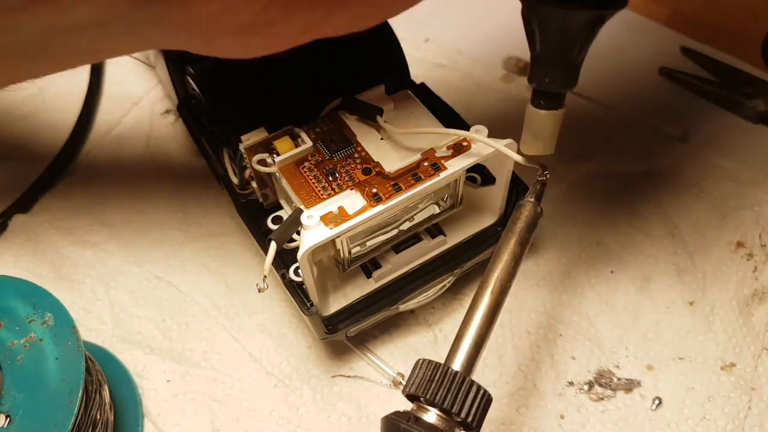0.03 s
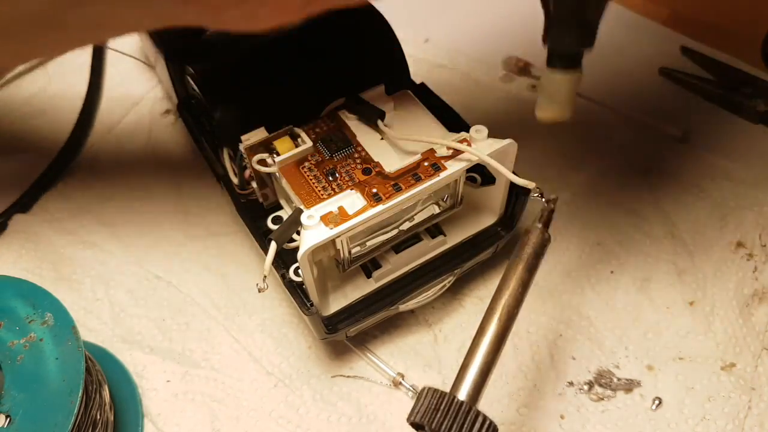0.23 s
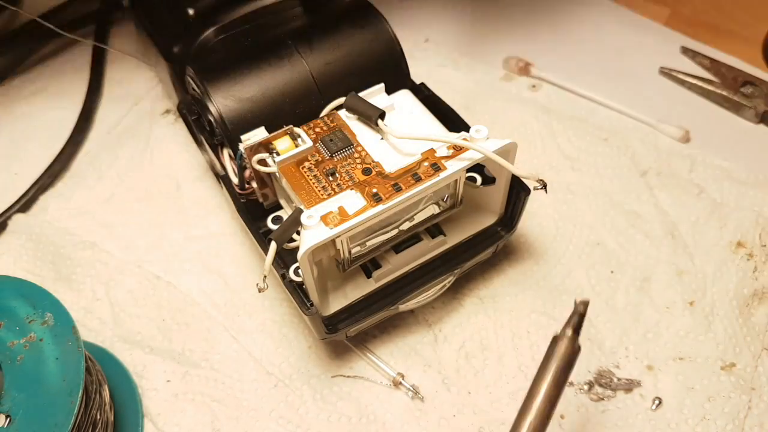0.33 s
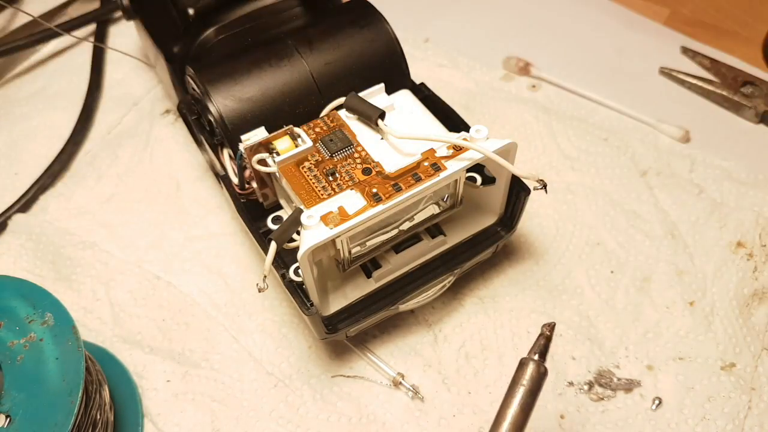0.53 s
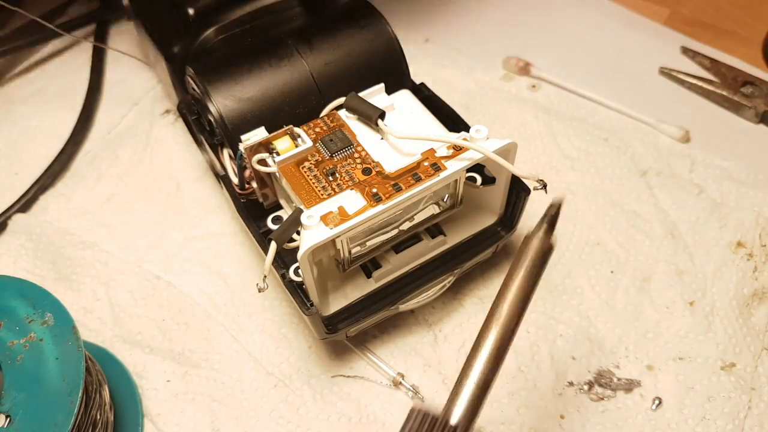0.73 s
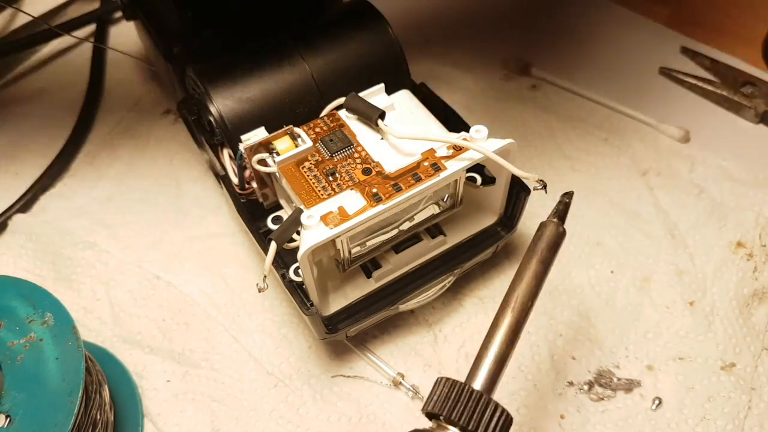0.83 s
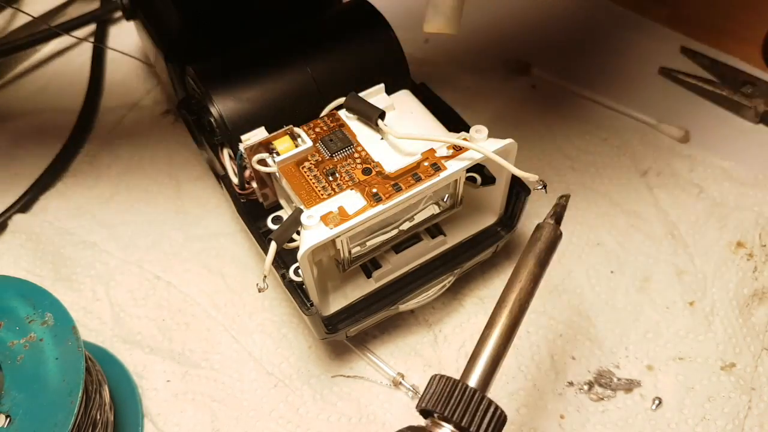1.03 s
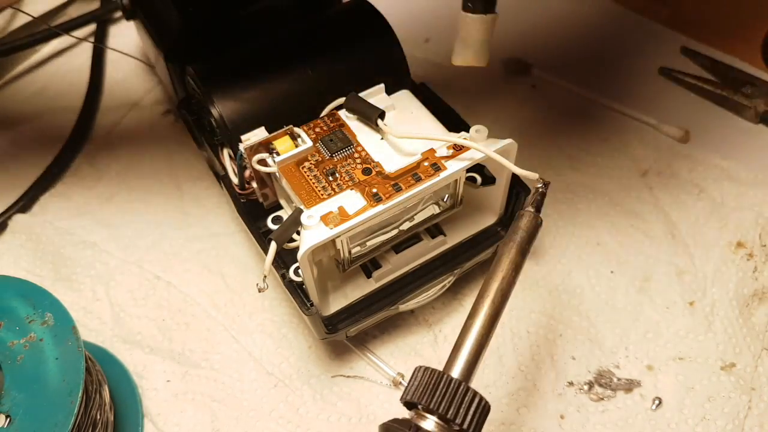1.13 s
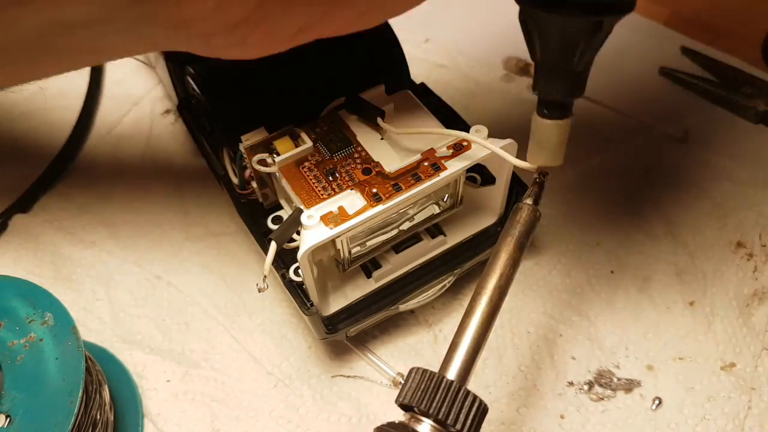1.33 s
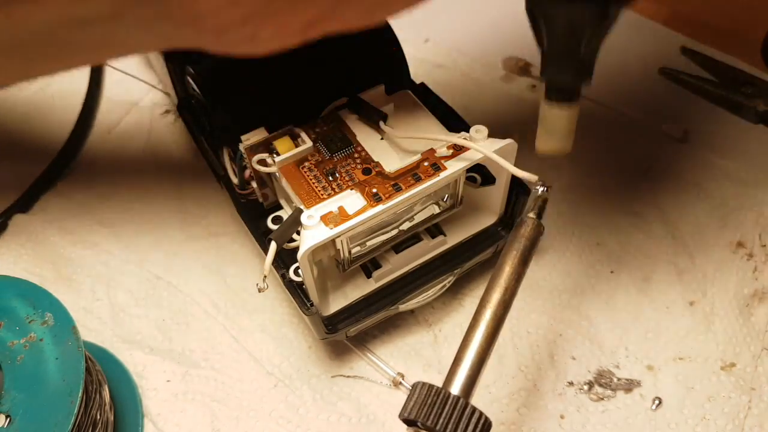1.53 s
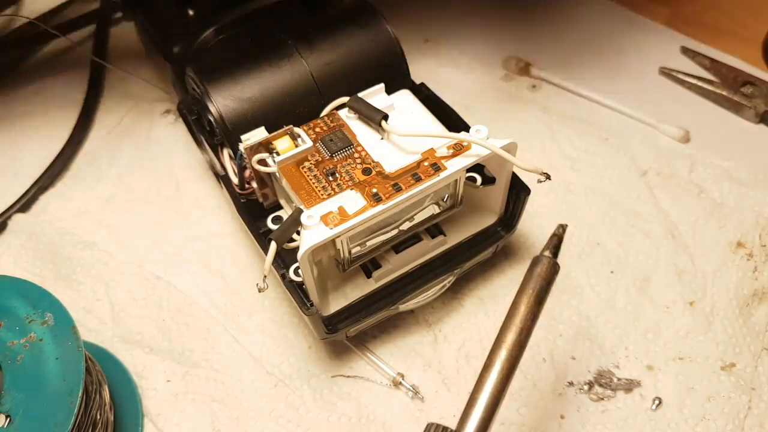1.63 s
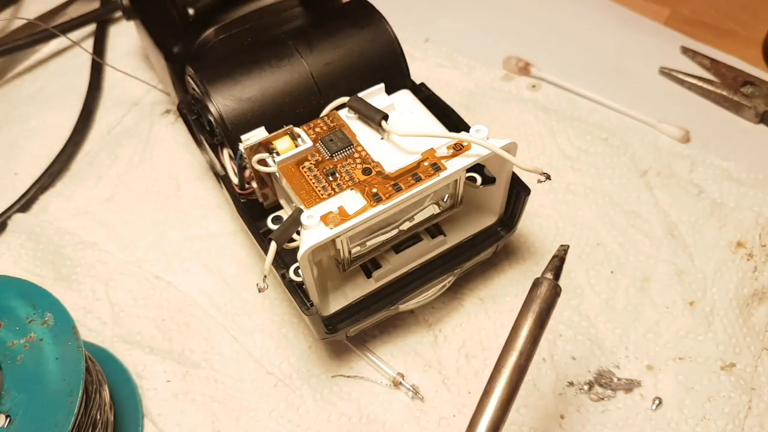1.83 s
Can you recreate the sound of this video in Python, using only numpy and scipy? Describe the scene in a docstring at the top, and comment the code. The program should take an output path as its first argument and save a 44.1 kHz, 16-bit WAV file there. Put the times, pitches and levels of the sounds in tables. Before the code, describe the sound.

Close to the microphone, a desoldering pump releases with a hard clack and latches again with a smaller click. After a pause it clacks once more, followed by faint taps, in a quiet, dry workroom.

```python
"""Desoldering pump, two shots

A spring-loaded pump, close by on a workbench in a small dry room with faint mains hum.
Each shot: the catch slips; the plunger scrapes up the barrel, slams into its stop, gulps air, drops back.
Between shots it is pushed down until it latches; a second push starts at the end. Tools tap faintly."""
import sys
import numpy as np
from scipy import signal
from scipy.fft import rfft, irfft, next_fast_len
from scipy.io import wavfile

SR = 44100
rng = np.random.default_rng(int(sys.argv[2]) if len(sys.argv) > 2 else 0)


def put_to_file(sound):
    """Save the sound as 16-bit audio at rate SR, in the file named by the first command-line argument."""
    columns = np.atleast_2d(sound).T  # one column per channel
    safe = np.clip(columns, -1, 1)
    whole_steps = np.round(safe * 32767)
    wavfile.write(sys.argv[1], SR, whole_steps.astype(np.int16))


N = 83790

# room noise spectrum (frequency [Hz], gain [dB])
FLOOR_TONE = [(20, -16), (40, -19.5), (70, -15.5), (100, -12), (135, -14), (200, -13.5), (400, -18.5),
              (700, -24.5), (1800, -26), (4000, -34), (9000, -44), (11000, -42), (13000, -39), (16000, -39)]
# room noise left-right match (frequency [Hz], correlation)
FLOOR_CORRELATION = [(60, .6), (240, .66), (950, -0.091), (3800, -.15), (15000, -0.08)]
# mains hum (frequency [Hz], level [dB])
HUM_PARTIALS = [(99.8, -75.5), (498, -88)]

# plunger strokes (start [s], peak time [s], level [dB], 60 dB rise [s], 60 dB fall [s])
FLIGHT_STROKES = [(.2365, .2515, -33, .04, 0.084), (1.5585, 1.579, -32, 0.051, 0.043)]
PUSH_STROKES = [(.569, .604, -56.5, 0.15, 0.13), (.612, .618, -52, 0.044, .03),
                (.657, .668, -54, .08, 0.035), (1.864, 1.893, -63, 0.47, 0.12)]
# knocks on the barrel (time [s], level [dB], t60 [s])
CLACK_HITS = [(0.2429, -8.5, 0.032), (1.571, -5.5, 0.054), (1.5804, -25, 0.0073)]
# end-stop hits and bounces (time [s], relative level [dB], pitch ratio)
SLAM_HITS = [(.2503, -2, 1.02), (.2543, -1.5, .99), (.2623, -18, 1), (1.5663, -22, 1), (1.5809, -6, 1.02),
             (1.5842, -9.5, 1), (1.5865, -16, 1), (1.592, -18, 1)]
# casing recoil (time [s], level [dB], frequency [Hz])
THUMP_HITS = [(.2505, -18, 218), (1.5805, -13.5, 303)]
# air pulses (time [s], level [dB])
GULP_PULSES = [(0.2509, -31), (1.5781, -31)]
# small impacts (time [s], relative level [dB])
SLIP_HITS = [(0.2299, -41.5), (1.552, -33)]
DROP_HITS = [(0.3041, -22.5), (.3132, -50), (1.6208, -22.5), (1.628, -40)]
TAP_HITS = [(0.4583, -45.5), (1.677, -54), (1.7852, -51.5)]
BUMP_HITS = [(0.5914, -35), (0.598, -35), (0.6578, -35.5), (.6705, -52), (.672, -27.5), (1.897, -32.5)]
LATCH_HITS = [(0.619, -16.5)]
PING_HITS = [(1.8645, -41.5)]

# modes of struck parts (frequency [Hz], relative level [dB], t60 [s])
BARREL_MODES = [(520, -22, .025), (655, -23, .025), (800, -20, .02), (960, -24, .025), (1222, -11, .022),
                (1490, -12, .025), (1720, 0, .012), (1760, -21, .07), (1930, -21, .04), (2090, -20, .025),
                (2690, -24, .03), (3070, -20, .035), (4050, -28, .045)]
PLUNGER_MODES = [(1500, -4, .005), (2050, 0, .006), (3700, -6, .006), (6100, -6, .012), (6450, -10, .01)]
CATCH_MODES = [(1600, -5, .006), (2150, 0, .009), (2400, -8, .04), (3246, -22, .07), (4200, -14, .02),
               (6250, -5, .012)]
SPRING_MODES = [(1930, 2, 0.025), (2130, -8, 0.035), (6300, -16, 0.12), (12900, -13, .09)]

# contact, friction and bench echo spectra (frequency [Hz], gain [dB])
SLIP_EQ = [(200, -16.5), (1000, -18), (1900, -18.5), (2500, -1.5), (3600, -12.5), (5400, -8), (8500, -29.5),
           (16000, -29)]
FLIGHT_EQ = [(50, -9.5), (300, 0.5), (750, 0.5), (1050, -4.5), (1600, -2.5), (3000, -4), (4500, -9),
             (7000, -7), (9000, -18), (13000, -13.5), (16000, -13)]
CLACK_EQ = [(60, -14.5), (350, 6), (1000, -13.5), (1500, 3), (3000, 0.5), (5000, -9), (7500, -7),
            (9000, -15), (12000, -13), (16000, -20)]
SLAM_EQ = [(60, -13), (250, -10.5), (900, 2), (1700, -3.5), (3200, -6), (6500, -9), (9000, -14.5),
           (12500, -4.5), (16000, -18.5)]
DROP_EQ = [(100, -26), (750, -24), (1350, -3), (2000, -1), (2900, -8), (3700, -2), (5100, -9), (6150, 0),
           (7200, -9), (9000, -19), (15000, -14)]
TAP_EQ = [(200, -14), (900, -22), (1350, 12), (2100, -9), (3200, 2), (5000, 1.5), (6500, -6.5),
          (8200, -0.5), (10000, -8), (16000, -6)]
PUSH_EQ = [(40, -10.5), (160, 3.5), (500, -11.5), (1200, -14.5), (2400, -9), (4000, -13.5), (7000, -20),
           (9000, -20), (16000, -22)]
BUMP_EQ = [(40, -15), (130, -3), (220, 4.5), (420, -4.5), (650, -1.5), (950, -14), (2400, -10.5),
           (6000, -17.5), (16000, -32.5)]
LATCH_EQ = [(60, -26), (200, -16), (900, -16), (1400, -6), (2350, 0), (3500, -4), (6300, -5), (8500, -12),
            (11000, -11), (16000, -19)]
BENCH_EQ = [(100, -5), (700, 2), (1700, -3), (3000, -1), (8000, -3), (16000, 0.5)]

# noise common to both channels (frequency [Hz], power share)
COMMON_SHARE = [(300, .95), (1500, .55), (4000, .45), (12000, .35)]
# stereo balance (frequency [Hz], left minus right [dB])
LEFT_BIAS = [(100, -.5), (700, -0.03), (2000, 2.5), (4400, -0.5), (8000, 1), (14000, 3.5)]
# room decay (frequency [Hz], t60 [s])
ROOM_DECAY = [(100, .11), (400, 0.057), (1000, 0.05), (2000, .115), (5000, .12), (10000, 0.059),
              (16000, 0.1084)]

FIRE_LAG_S, COCK_LAG_S = .000018, .00011  # right channel delay
BENCH_DB, BENCH_T60_S, BENCH_DELAY_S, ROOM_DELAY_S = -12.5, .04, .0028, .006
RING_RISE_CYCLES, SCRAPE_ONSET_S = .37, .001


def amp(db):
    """Decibels to gain."""
    return 10 ** (np.asarray(db) / 20)


def unit(x):
    """Scale to unit mean channel energy."""
    return x / np.sqrt(np.mean(np.sum(x ** 2, -1)) + 1e-20)


def lookup(table, hz):
    """Interpolate over log frequency."""
    table_hz, values = np.transpose(table)
    return np.interp(np.log(hz + 1), np.log(table_hz), values)


def clock(size=8192):
    """Time axis [s]."""
    return np.arange(size) / SR


def sequence(events):
    """Stereo mix of (time [s], level [dB], sound) events."""
    mix = np.zeros((2, N))
    for at_s, db, sound in events:
        span = mix[:, round(at_s * SR):][:, :sound.shape[-1]]
        span += amp(db) * sound[..., :span.shape[1]]
    return mix


def colour(x, eq, size=2048):
    """Minimum-phase filter with unit-energy taps."""
    log_gain = np.log(amp(lookup(eq, abs(np.fft.fftfreq(size, 1 / SR)))))
    response = np.exp(np.conj(signal.hilbert(log_gain)))
    taps = np.fft.ifft(response).real[:size // 2]
    return signal.fftconvolve(x, unit(taps)[None], axes=1)[:, :x.shape[1]]


def noise_pair(size):
    """Stereo noise, most alike in the bass."""
    spectra = rfft(rng.standard_normal((3, size)))
    share = np.clip(lookup(COMMON_SHARE, np.fft.rfftfreq(size, 1 / SR)), 0, 1)
    return irfft(np.sqrt(share) * spectra[0] + np.sqrt(1 - share) * spectra[1:], size)


def contact(eq, rattle_share, t60_s):
    """Sharp first touch, then a dying rattle of tiny ones with the given energy share."""
    t = clock()
    force = np.sqrt(rattle_share) * unit(noise_pair(len(t)) * amp(-60 * t / t60_s) * (t > 0))
    force[:, 0] = -np.sqrt(1 - rattle_share)
    return unit(colour(force, eq))


def ring(modes, pitch=1):
    """Decaying modes of a struck part; pressure follows surface velocity."""
    t = clock()
    motion = 0
    for hz, db, t60_s in modes:
        envelope = amp(db - 60 * t / t60_s) * (1 - np.exp(-t * hz / RING_RISE_CYCLES))
        motion += envelope * np.sin(2 * np.pi * hz * pitch * t) / hz
    return -unit(np.diff(motion, prepend=0))


def room_tone(noise_db=-74):
    """Steady room noise and mains hum."""
    hz, t = np.fft.rfftfreq(N, 1 / SR), clock(N)
    left, other = rfft(rng.standard_normal((2, N)))
    match = np.clip(lookup(FLOOR_CORRELATION, hz), -1, 1)
    right = match * left + np.sqrt(1 - match ** 2) * other
    air = irfft(np.array([left, right]) * amp(lookup(FLOOR_TONE, hz)), N)
    hum = sum(amp(db) * np.sqrt(2) * np.sin(2 * np.pi * (f * t + rng.random())) for f, db in HUM_PARTIALS)
    return amp(noise_db) * np.sqrt(N) * unit(air) + hum


def catch_slips():
    """The catch clicks off the plunger."""
    return sequence((s, db, contact(SLIP_EQ, .53, t60_s=.016)) for s, db in SLIP_HITS)


def plunger_scrape(strokes, eq, grain_db):
    """Grainy friction along the barrel; each stroke swells and fades."""
    t = clock(N)
    envelope = 0
    for start_s, peak_s, db, rise_s, fall_s in strokes:
        onset = np.clip((t - start_s) / SCRAPE_ONSET_S, 0, 1)
        envelope += onset * amp(db - 60 * np.maximum((peak_s - t) / rise_s, (t - peak_s) / fall_s))
    grains = amp(grain_db * np.repeat(rng.standard_normal(N), 32)[:N])
    grains /= np.sqrt(np.mean(grains ** 2))
    return colour(noise_pair(N) * envelope * grains, eq)


def barrel_clacks():
    """The freed plunger knocks against the barrel."""
    return sequence((s, db, contact(CLACK_EQ, .97, t60_s)) for s, db, t60_s in CLACK_HITS)


def stop_slams(ring_db=-1, contact_db=-9):
    """The plunger hits its stop and bounces, ringing the barrel."""
    barrel = sequence((s, db + ring_db, ring(BARREL_MODES, pitch)) for s, db, pitch in SLAM_HITS)
    hits = sequence((s, db + contact_db, contact(SLAM_EQ, .62, t60_s=.028)) for s, db, _ in SLAM_HITS)
    return barrel + hits


def casing_thumps(t60_s=.06):
    """Recoil excites one low casing mode."""
    return sequence((s, db, ring([(hz, 0, t60_s)])) for s, db, hz in THUMP_HITS)


def air_gulps(width_s=.0013):
    """Nozzle suction: a pressure dip inside a wider, weaker rise."""
    pressure = np.zeros(N)
    for at_s, db in GULP_PULSES:
        u = (clock(N) - at_s) / width_s
        pressure -= amp(db) * (np.exp(-u ** 2) - np.exp(-(u / 4) ** 2) / 4)
    return pressure


def plunger_drops(ring_db=-4):
    """The plunger drops back, rings and bounces once."""
    plunger = amp(ring_db) * ring(PLUNGER_MODES)
    return sequence((s, db, plunger + contact(DROP_EQ, .88, t60_s=.01)) for s, db in DROP_HITS)


def tool_taps():
    """Tools tap faintly in the hands."""
    return sequence((s, db, contact(TAP_EQ, .86, t60_s=.015)) for s, db in TAP_HITS)


def body_bumps():
    """Hand and plunger bump the body while cocking."""
    return sequence((s, db, contact(BUMP_EQ, .79, t60_s=.017)) for s, db in BUMP_HITS)


def catch_latch(ring_db=-6.5, contact_db=5.5):
    """The catch snaps home and rings."""
    snap = amp(ring_db) * ring(CATCH_MODES) + amp(contact_db) * contact(LATCH_EQ, .91, t60_s=.009)
    return sequence((s, db, snap) for s, db in LATCH_HITS)


def spring_ping():
    """The spring rings as the push takes hold."""
    return sequence((s, db, ring(SPRING_MODES)) for s, db in PING_HITS)


def place(x, lag_s, room_db):
    """Add bench reflections and a short room tail; shift left of centre."""
    t = clock(16384)
    bench = noise_pair(len(t)) * amp(-60 * t / BENCH_T60_S) * (t > BENCH_DELAY_S)
    bench = unit(colour(bench, BENCH_EQ))
    band_hz, frame_s, bands = signal.stft(noise_pair(len(t)), SR, nperseg=128)
    bands *= amp(-60 * frame_s / lookup(ROOM_DECAY, band_hz)[:, None])
    tail = signal.istft(bands, SR, nperseg=128)[1][:, :len(t)]
    echoes = amp(BENCH_DB) * bench + amp(room_db) * unit(tail * (t > ROOM_DELAY_S))
    wet = x + signal.fftconvolve(x, echoes, axes=1)[:, :N]
    size = next_fast_len(N + len(t))
    hz = np.fft.rfftfreq(size, 1 / SR)
    left = amp(lookup(LEFT_BIAS, hz) / 2)
    right = np.exp(-2j * np.pi * hz * lag_s) / left
    return irfft(rfft(wet, size) * np.array([left, right]), size)[:, :N]


def scene():
    """Shots, small clicks and cocking over room tone."""
    shots = plunger_scrape(FLIGHT_STROKES, FLIGHT_EQ, grain_db=-.5)
    shots += barrel_clacks() + stop_slams() + casing_thumps() + air_gulps()
    mix = place(shots, FIRE_LAG_S, room_db=-16)
    mix += place(catch_slips() + plunger_drops() + tool_taps(), FIRE_LAG_S, room_db=-24.5)
    cocking = plunger_scrape(PUSH_STROKES, PUSH_EQ, grain_db=1.5)
    cocking += catch_latch() + body_bumps() + spring_ping()
    mix += place(cocking, COCK_LAG_S, room_db=-16.5)
    return mix + room_tone()


def record(dry, low_cut_hz=32, high_cut_hz=15900):
    """Bass roll-off and band limit."""
    highpass = signal.butter(2, low_cut_hz, "high", fs=SR, output="sos")
    lowpass = signal.firwin(255, high_cut_hz, window=("kaiser", 8), fs=SR)
    return signal.oaconvolve(signal.sosfilt(highpass, dry), lowpass[None], "same")


dry = scene()
out = record(dry)
put_to_file(out)
```